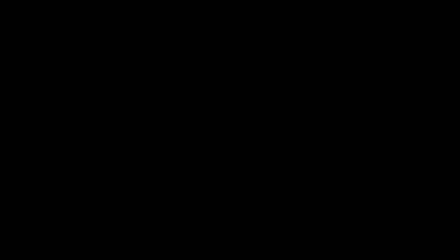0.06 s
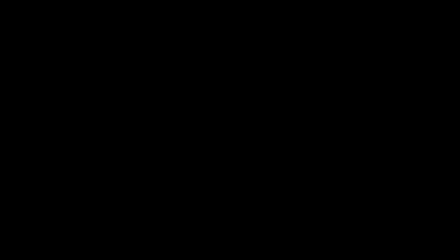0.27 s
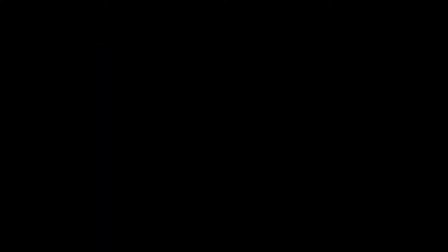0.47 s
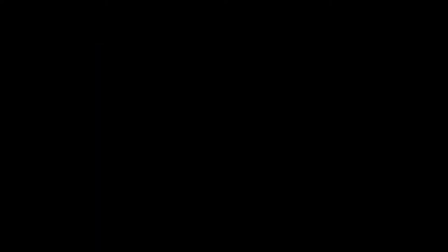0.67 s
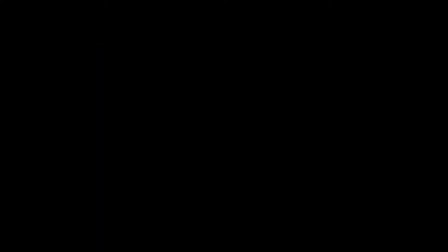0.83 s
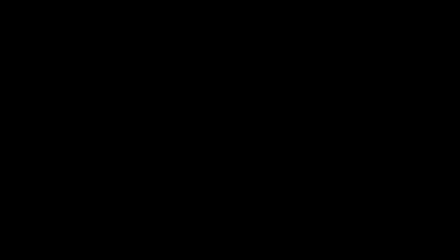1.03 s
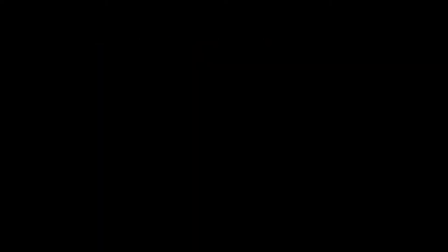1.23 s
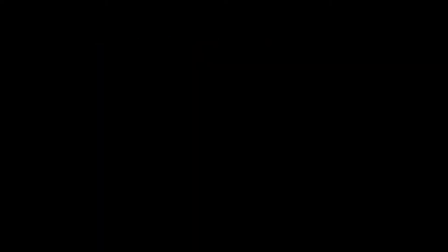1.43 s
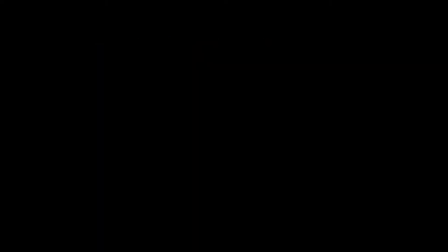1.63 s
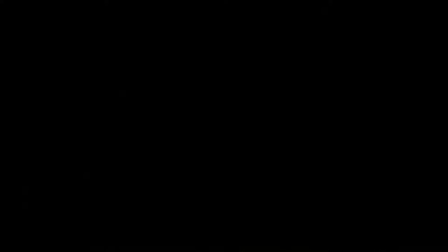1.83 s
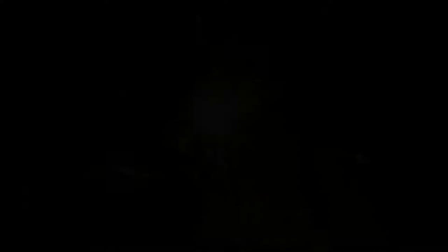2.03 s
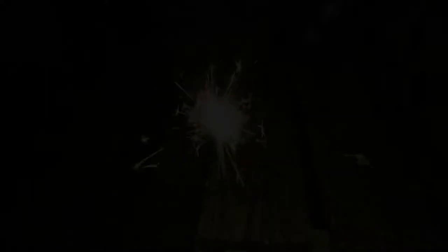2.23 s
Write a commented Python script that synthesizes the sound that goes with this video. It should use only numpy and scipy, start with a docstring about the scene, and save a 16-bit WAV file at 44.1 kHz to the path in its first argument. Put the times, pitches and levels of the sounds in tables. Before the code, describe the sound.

A sparkler burns throughout, a steady, slightly flickering fizz with a soft flame rush and dense tiny spits. Faint clicks dot it from 0.25 to 1.7 s. Behind it shimmers a high fluttering whine, like night insects. At 1.8 s a loud, hard knock hits hollow wood, bounces with a second sharp clack at 1.95 s and a weaker tap at 2.0 s, with faint low thuds, while the fizz continues.

```python
"""Sparkler and a knock at night

Outdoors at night, one microphone: a sparkler burns as shaped noise, with random spits and a few clicks.
Near the end something hard knocks, as on hollow wood, and bounces to rest: dying sines and noise tails.
Dull low thuds follow as things settle. Behind it all shimmer two narrow fluttering bands of noise
and a thin high voice, likely a chorus of night insects."""
import sys
import numpy as np
from scipy import signal
from scipy.fft import rfft, irfft
from scipy.io import wavfile

SR = 44100
rng = np.random.default_rng(int(sys.argv[2]) if len(sys.argv) > 2 else 0)


def generate_wav(sig):
    """Save sig (samples, or channels by samples) to the path in sys.argv[1] as 16-bit PCM at SR."""
    pcm = np.round(np.clip(np.atleast_2d(sig).T, -1, 1) * 32767).astype(np.int16)
    wavfile.write(sys.argv[1], SR, pcm)


N = 101430   # samples, 2.3 s
TIME = np.arange(N) / SR


def from_db(db):
    """Decibels to gain."""
    return 10 ** (np.asarray(db) / 20)


def rms_one(x):
    """Scale to rms 1."""
    return x / np.sqrt(np.mean(x ** 2) + 1e-20)


def in_time(rows):
    """A curve of (seconds, value), read at every sample."""
    return np.interp(TIME, *np.transpose(rows))


def drift(rate_hz):
    """Smooth random wander with spread 1: noise through two equal one-pole low-passes."""
    step = 40   # samples between the points of the slow curve
    pole = np.exp(-2 * np.pi * rate_hz * step / SR)
    noise = rng.standard_normal(N // step + 2002)
    slow = signal.lfilter([1], [1, -2 * pole, pole * pole], noise)[2000:]   # skip the filter's start
    return np.interp(np.arange(N) / step, np.arange(len(slow)), rms_one(slow))


def coloured(white, spectrum):
    """Shape noise so that white of rms 1 takes on a spectrum in dB per Hz."""
    hz, db = np.transpose(spectrum)
    bins = np.maximum(np.arange(N // 2 + 1) * SR / N, 1)
    gain = from_db(np.interp(np.log(bins), np.log(hz), db))
    return irfft(rfft(white) * gain, N) * np.sqrt(SR / 2)


def band_noise(low_hz, high_hz):
    """Noise between two edges, rms 1."""
    band = signal.butter(2, [low_hz, high_hz], "band", fs=SR, output="sos")
    return rms_one(signal.sosfilt(band, rng.standard_normal(N)))


def decay(start, t60):
    """An envelope that jumps to 1 and falls 60 dB in t60 seconds."""
    return (TIME >= start) * from_db(-60 * np.clip((TIME - start) / t60, 0, 4))


def ring(start, hz, t60):
    """A struck mode: a dying sine."""
    return decay(start, t60) * np.sin(2 * np.pi * hz * (TIME - start))


# Strength of the burn, heard as the level of the fizz. Each row: time in seconds, level in dB.
BURN = [(0,-1),(.13,0.5),(.2,-1),(.4,-0.5),(.5,1),(.58,0.5),(.68,-1.1),(.8,1.5),(.92,-2),(1.0,-1.8),(1.1,1.5),(1.2,-1),(1.3,0),(1.47,-0.3),(1.7,0),(1.95,3),(2.1,-1.5),(2.3,-0.4)]
# Rush of the flame at the microphone. Each row: frequency in Hz, smooth noise level in dB per Hz.
FLAME_SPECTRUM = [(25,-90),(60,-88),(95,-84),(116,-75.5),(190,-81),(250,-74.5),(350,-83),(500,-76.5),(750,-78.5),(1400,-77),(2400,-76.5),(3800,-84),(5000,-86.5),(9000,-104)]
# Fizz of the sparks at the microphone. Each row: frequency in Hz, smooth noise level in dB per Hz.
FIZZ_SPECTRUM = [(1500,-105),(4500,-100.5),(6000,-85),(8300,-83),(9500,-77.5),(10800,-77),(12500,-80.5),(14000,-85.5),(15700,-93)]
FLAME_FOLLOWS = 0.88   # dB of flame per dB of burn
FLAME_FLICKER_DB, FIZZ_FLICKER_DB, FLICKER_HZ = 0.5, 1.1, 28
SPITS_PER_S = 300   # at a burn of 0 dB
SPIT_SPREAD_DB, SPIT_MAX_DB = 3, 14   # mean and ceiling of the random sizes
SPIT_DB = -8.5   # all spits together, relative to the smooth noise


def spits(burn_db):
    """Tiny bursts as single-sample impulses of random size and sign, more frequent in a stronger burn."""
    size_db = np.minimum(SPIT_SPREAD_DB * rng.exponential(1, N), SPIT_MAX_DB)
    impulses = from_db(size_db) * rng.choice([-1, 1], N)
    chance = SPITS_PER_S * from_db(burn_db) / SR
    return from_db(SPIT_DB) * rms_one(impulses * (rng.random(N) < chance))


def sparkler():
    """Flame and sparks are coloured noise with the same spits, following one burn and one flicker."""
    burn_db = in_time(BURN)
    flicker = drift(FLICKER_HZ)
    bursts = spits(burn_db)
    flame = coloured(rng.standard_normal(N) + bursts, FLAME_SPECTRUM)
    fizz = coloured(rng.standard_normal(N) + bursts, FIZZ_SPECTRUM)
    flame_db = FLAME_FOLLOWS * burn_db + FLAME_FLICKER_DB * flicker
    fizz_db = burn_db + FIZZ_FLICKER_DB * flicker
    return flame * from_db(flame_db) + fizz * from_db(fizz_db)


# Faint clicks. Each row: start in seconds, level in dB before the trim, low edge in Hz,
# high edge in Hz, t60 in seconds.
CLICK_ROWS = [(0.255,-26.5,900,6500,0.016),(.669,-20.5,1130,2270,.018),(0.751,-29,1690,2500,.035),(.788,-32,950,1900,0.015),(1.11,-25,6000,14000,.004),(1.304,-23,8000,15000,.004),(1.53,-24,8000,15000,.004),(1.699,-26.5,600,2180,0.012)]
CLICK_TRIM_DB = -2


def clicks():
    """Short pops and ticks: bands of noise that die within milliseconds."""
    out = np.zeros(N)
    for start, db, low_hz, high_hz, t60 in CLICK_ROWS:
        out += from_db(db + CLICK_TRIM_DB) * decay(start, t60) * band_noise(low_hz, high_hz)
    return out


# The knock and its bounces. Each row: start in seconds, crack level in dB, crack pitch in Hz,
# then the levels in dB of the hollow body, scatter, snap and splash of treble.
BLOWS = [(1.8143,-2,1720,2,3,0,-11.5),(1.8563,-25,1320,-32,-14,-28,-49),(1.941,-27,1410,-19,-13.5,-38,-42),(1.9555,-3,1400,-15,-0.5,-5,-29),(2.0195,-18,1350,-23.5,-7.5,-28,-48)]
# Modes of the wood. Each row: frequency in Hz, level in dB relative to the body, t60 in seconds.
WOOD_MODES = [(71,-26.5,0.27),(95,-12,0.053),(143,-12.5,0.11),(163,-26,0.18),(241,-24,0.15),(369,-23.5,0.12),(510,-17.5,0.11),(591.5,-19,0.094),(669,-16,0.066),(752,-28,0.12),(986,-17,0.056),(1205,-8.5,0.013),(2140,-20,0.031),(2845,-14.5,0.021)]
# Scattered tail by band. Each row: low edge in Hz, high edge in Hz, level in dB relative to
# the blow's scatter, t60 in seconds.
SCATTER_BANDS = [(90,304,-28,0.28),(302,910,-21,0.15),(810,1820,-19.5,0.099),(1800,3900,-27,0.067)]
# Short modes of the crack. Each row: multiple of the crack pitch, level in dB relative to
# the crack, t60 in seconds.
CRACK_MODES = [(.42,-3.5,0.0041),(.76,-7.5,0.013),(1,3,.013),(1.43,-6.5,0.0064)]
SCATTER_RISE_S = 0.00085
SNAP_HZ, SNAP_T60_S = 3980, 0.0019
SPLASH_BAND_HZ, SPLASH_T60_S = (5100, 12500), 0.0083
SPLASH_TAIL_DB, SPLASH_TAIL_T60_S = -13.5, 0.14   # tail level relative to the splash


def crack(start, pitch_hz):
    """The hard contact: a cluster of short modes tuned to one pitch."""
    return sum(from_db(db) * ring(start, ratio * pitch_hz, t60) for ratio, db, t60 in CRACK_MODES)


def hollow_wood(start):
    """The struck body rings in its modes, with alternating polarity."""
    out = np.zeros(N)
    for k, (hz, db, t60) in enumerate(WOOD_MODES):
        out += (-1) ** k * from_db(db) * ring(start, hz, t60)
    return out


def splash_envelope(start):
    """A quick decay of the treble over a quieter, longer tail."""
    tail = from_db(SPLASH_TAIL_DB) * decay(start, SPLASH_TAIL_T60_S)
    return decay(start, SPLASH_T60_S) + tail


def scatter(start, tails):
    """A diffuse tail: each noise band rises briefly, then dies at its own rate."""
    rise = np.clip((TIME - start) / SCATTER_RISE_S, 0, 1)
    return rise * sum(noise * decay(start, t60) for noise, t60 in tails)


def knocks():
    """Each blow sums a snap, a treble splash, a ringing crack, the hollow wood and a scattered tail."""
    out = np.zeros(N)
    treble = band_noise(*SPLASH_BAND_HZ)
    tails = [(from_db(db) * band_noise(low, high), t60) for low, high, db, t60 in SCATTER_BANDS]
    for start, crack_db, crack_hz, body_db, scatter_db, snap_db, splash_db in BLOWS:
        out += from_db(snap_db) * ring(start, SNAP_HZ, SNAP_T60_S)
        out += from_db(splash_db) * treble * splash_envelope(start)
        out += from_db(crack_db) * crack(start, crack_hz)
        out += from_db(body_db) * hollow_wood(start)
        out += from_db(scatter_db) * scatter(start, tails)
    return out


# Soft low thuds as things settle. Each row: centre in seconds, level in dB, frequency in Hz.
THUD_ROWS = [(1.874,-20.5,154),(1.915,-28.5,128),(2.115,-37.5,133)]
THUD_WIDTH_S = 0.012   # from the centre to 1/e


def thuds():
    """Dull swells of a few low cycles: sines under a bell-shaped envelope."""
    out = np.zeros(N)
    for centre, db, hz in THUD_ROWS:
        swell = np.exp(-((TIME - centre) / THUD_WIDTH_S) ** 2)
        out += from_db(db) * swell * np.sin(2 * np.pi * hz * (TIME - centre))
    return out


def chorus(hz, width_hz, flutter_db, flutter_hz):
    """Many shrill voices blurred into one narrow band of noise with a fluttering level, rms 1."""
    band = band_noise(hz - width_hz / 2, hz + width_hz / 2)
    return rms_one(band * from_db(flutter_db * drift(flutter_hz)))


# Low whine at the microphone. Each row: time in seconds, level in dB.
LOW_WHINE_LEVEL = [(0,-44),(.3,-41),(.6,-42.5),(.8,-40),(.95,-40),(1.1,-40.5),(1.78,-40.5),(1.86,-42.5),(2.0,-41),(2.15,-39),(2.3,-40.5)]
# High whine with its halo at the microphone. Each row: time in seconds, level in dB.
HIGH_WHINE_LEVEL = [(0,-34.5),(.08,-30.5),(.16,-35),(.24,-29),(.36,-34.5),(.46,-30),(.58,-34.5),(.69,-30.5),(.77,-35.5),(.88,-32.5),(1.0,-34),(1.3,-33),(1.77,-33),(1.83,-39),(1.91,-31.5),(1.98,-38),(2.1,-33),(2.3,-34)]
# Each voice: centre in Hz, width in Hz, flutter in dB, flutter rate in Hz.
LOW_WHINE, HIGH_WHINE = (3296, 237, 0.68, 44), (7200, 415, 1, 23)
THIN_WHINE, THIN_WHINE_DB = (7740, 79, 2.5, 9.1), -52   # faint, almost pure
HALO_WIDTH_HZ, HALO_DB = 890, -11   # level relative to the core of the high band


def whine():
    """In the background: a weaker low band, a strong high one with a wider halo, a thin voice on top."""
    hz, _, flutter_db, flutter_hz = HIGH_WHINE
    halo = from_db(HALO_DB) * chorus(hz, HALO_WIDTH_HZ, flutter_db, flutter_hz)
    high = from_db(in_time(HIGH_WHINE_LEVEL)) * rms_one(chorus(*HIGH_WHINE) + halo)
    low = from_db(in_time(LOW_WHINE_LEVEL)) * chorus(*LOW_WHINE)
    thin = from_db(THIN_WHINE_DB) * chorus(*THIN_WHINE)
    return low + high + thin


def scene():
    """Everything reaches one microphone."""
    return (sparkler() + clicks() + knocks() + thuds() + whine())[None]


LOW_CUT_HZ, HIGH_CUT_HZ = 46.4, 15700


def record(dry):
    """The microphone channel rounds the loudest peaks, then loses the deep bass and the top."""
    rounded = np.tanh(dry)
    low_cut = signal.butter(4, LOW_CUT_HZ, "high", fs=SR, output="sos")
    high_cut = signal.ellip(12, .1, 80, HIGH_CUT_HZ, fs=SR, output="sos")   # .1 dB ripple, 80 dB stop
    return signal.sosfilt(high_cut, signal.sosfilt(low_cut, rounded))


dry = scene()
out = record(dry)
generate_wav(out)
```